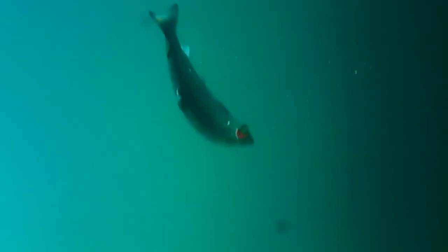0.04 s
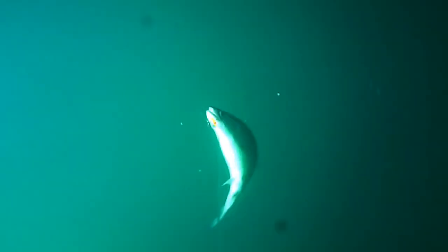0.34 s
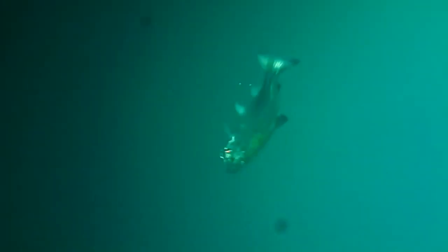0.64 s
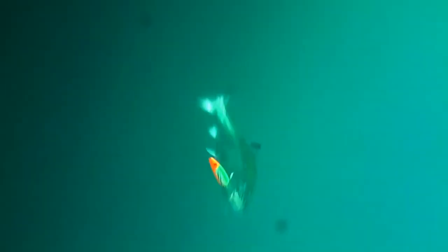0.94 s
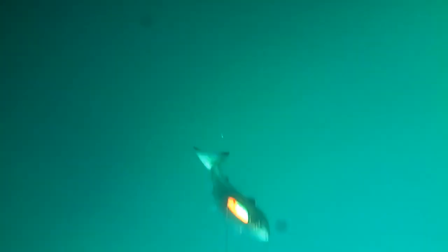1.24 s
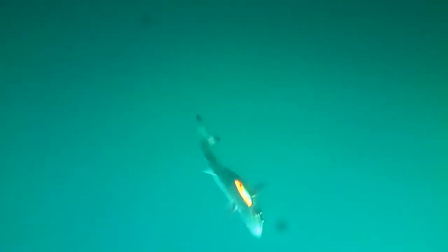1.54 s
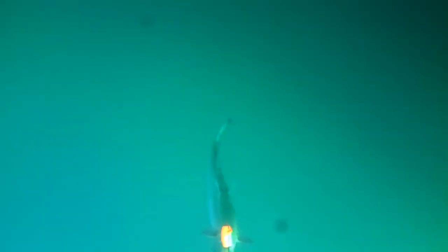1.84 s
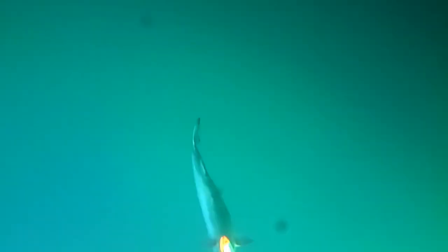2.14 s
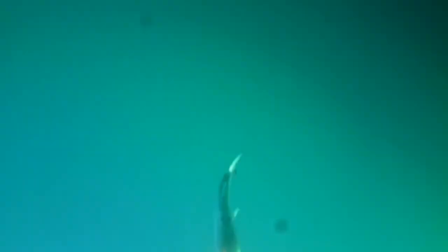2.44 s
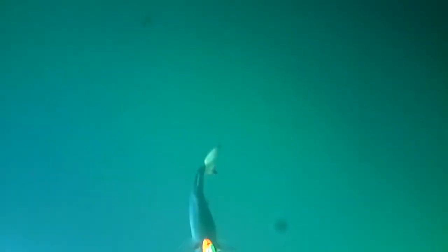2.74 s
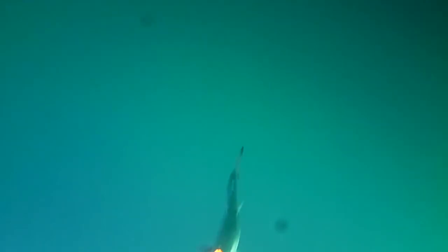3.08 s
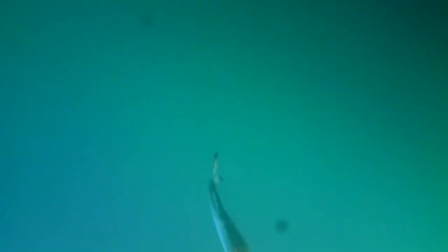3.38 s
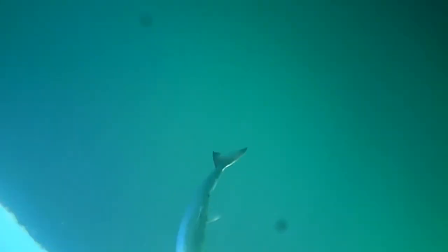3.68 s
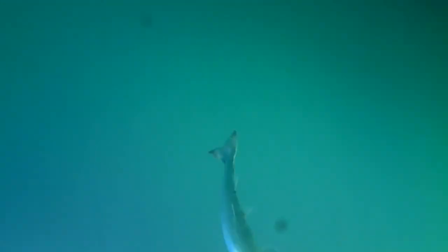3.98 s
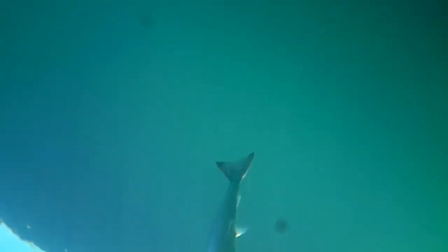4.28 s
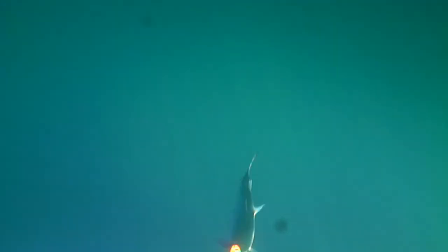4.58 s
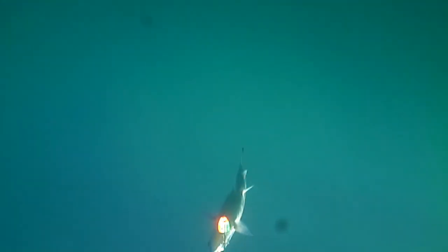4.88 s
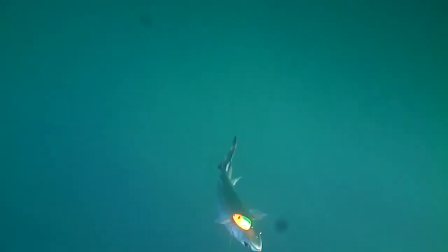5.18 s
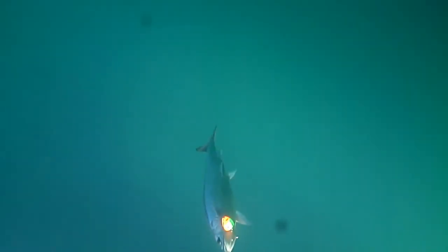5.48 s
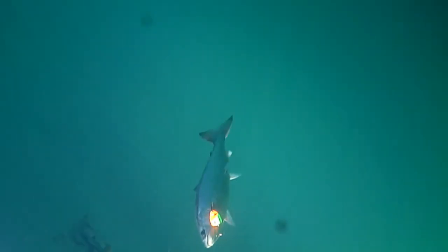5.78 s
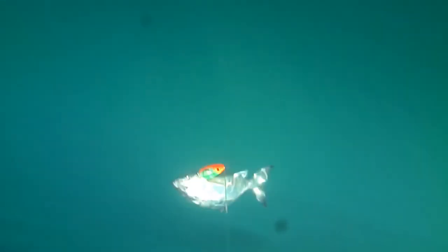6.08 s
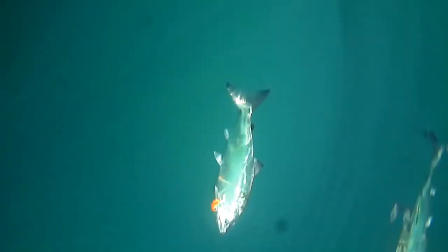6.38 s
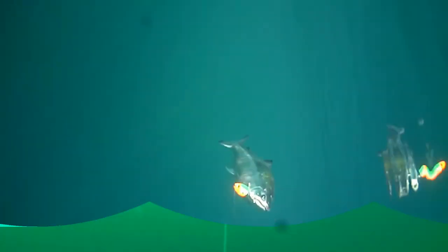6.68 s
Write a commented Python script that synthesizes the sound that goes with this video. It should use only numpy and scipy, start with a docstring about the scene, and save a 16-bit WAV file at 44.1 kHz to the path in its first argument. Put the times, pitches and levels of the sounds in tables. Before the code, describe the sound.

Muffled water rushes past a camera towed under the surface while a hooked fish fights behind it. The line gives a few scraping jerks, then judders in a quick rattle with low buffeting. It builds into a loud, raspy buzz whose pitch rises and falls with each pull, with a few dry ticks on top. After a last pull it fades to a faint buzz and water. Everything is heard from inside the sealed housing.

```python
"""A camera in a sealed housing is towed under water while a hooked fish fights on the line behind it.
Water rushes round the housing and shoves it about; the line gives a few jerks and short, faint notes.
From 0.75 s to 1.75 s the taut line judders in quick jerks that ring the housing near 2-3 kHz.
Then it sings: a buzzing tone whose pitch follows each pull, ringing the housing near 3 kHz, with a few
dry ticks on top. The last pull fades after 6.2 s, leaving a faint buzz and the water."""
import sys
import numpy as np
from scipy import signal
from scipy.fft import rfft, irfft, next_fast_len
from scipy.io import wavfile
from scipy.ndimage import uniform_filter1d

SR = 44100
rng = np.random.default_rng(int(sys.argv[2]) if len(sys.argv) > 2 else 0)


def materialize(psi):
    """Save the field psi as 16-bit PCM at rate SR to the path in sys.argv[1].

    A 1-D psi becomes a single channel; in a 2-D psi each row is a channel.
    """
    bounded = np.clip(np.atleast_2d(psi).T, -1, 1)
    quanta = np.round(bounded * 32767).astype(np.int16)
    wavfile.write(sys.argv[1], SR, quanta)


N = 296351
TIME = np.arange(N) / SR

# Pulls of the fish, each a surge of the line's note:
# full_pull_s, rise_s, hold_s, fall_s, top_pitch_hz, level_db, roughness_0_to_1
PULLS = [(0.066, .014, 0, 0.037, 511, -55, 0.5), (.209, .035, 0, 0.019, 501.5, -34, 0.76),
         (.323, .055, 0.058, 0.024, 744, -30, 0.79), (.473, .036, 0, .016, 491.4, -31, .7),
         (0.665, .076, 0.0094, .03, 608, -23.5, 0.91), (1.595, .092, 0.017, .015, 717.5, -20.5, 0.73),
         (1.752, .038, 0.0057, 0.083, 894, -20.5, 0.76), (1.847, .05, 0.05, 0.073, 728, -15, 0.48),
         (2.085, .051, 0.041, 0.06, 835, -14, 0.34), (2.325, .066, 0.078, 0.057, 834, -12, 0.14),
         (2.557, .035, 0.0059, 0.024, 723, -16, 0.43), (2.713, .062, 0.13, 0.076, 842, -12.5, 0.37),
         (3.143, .05, 0.056, 0.089, 782, -15.5, 0.54), (3.266, .055, 0.07, 0.031, 866, -19, 0.41),
         (3.461, .018, .015, .077, 754, -12, 0.17), (3.632, .025, 0.0029, 0.074, 683.3, -18, 0.66),
         (3.786, .032, 0.04, 0.043, 837, -9, 0.22), (3.927, .03, .006, 0.036, 883.5, -12, 0.42),
         (4.097, .055, 0.0029, 0.15, 977, -11.5, 0.47), (4.275, .051, 0, 0.09, 668, -15, .6),
         (5.006, .031, 0.06, 0.034, 637, -17, 0.03), (5.183, .027, 0.057, 0.051, 556.7, -24, 0.84),
         (5.354, .08, 0.034, 0.031, 692.4, -19.5, 0.17), (5.687, .09, 0.014, 0.026, 708.5, -19.5, 0.34),
         (5.969, .032, 0.051, .05, 748, -20, .95), (6.043, .05, 0.1, 0.19, 781.4, -14, 0.28)]
def pull_envelopes(t, release_power=1.5):
    """How hard each pull acts, 0-1: it builds, holds and lets go."""
    return np.array([np.exp(-(np.maximum(full_s - t, 0) / rise_s) ** 2
                            - (np.maximum(t - full_s - hold_s, 0) / fall_s) ** release_power)
                     for full_s, rise_s, hold_s, fall_s, *_ in PULLS])


# The line's note under the drag of the tow alone: time_s, pitch_hz, level_db
TOW_NOTE = [(0, 328.5, -67), (.55, 325.6, -62.5), (.75, 466, -42.5), (1.399, 580, -47.5),
            (1.7, 707.5, -20.5), (2.22, 635, -42), (2.6, 638.6, -23.5), (3.051, 550, -25.5),
            (3.39, 768.5, -24), (3.58, 585.5, -30.5), (4, 700.8, -27.5), (4.55, 551, -22),
            (4.8, 491.6, -41), (4.921, 476.4, -33), (5.499, 579.4, -34), (5.85, 417, -56),
            (6.398, 420, -43.5), (6.72, 364.4, -38)]
def line_tension(step=64, loudness_power=0.7, slack_rough=0.68, settle_s=0.0256):
    """Pitch, level and roughness of the line: the strongest pull lifts it out of its towing note."""
    t, tow = TIME[::step], np.array(TOW_NOTE)
    top_hz, top_db, top_rough = np.transpose(PULLS)[4:, :, None]
    tow_hz, tow_db = curve(tow[:, [0, 1]], t), curve(tow[:, [0, 2]], t)
    pull = pull_envelopes(t)
    pitch = tow_hz + (pull * (top_hz - tow_hz)).max(0)
    db = tow_db + (pull ** loudness_power * (top_db - tow_db)).max(0)
    # a loosely held line scrapes; a pull takes a moment to settle it into its note
    rough = slack_rough + (pull_envelopes(t - settle_s) * (top_rough - slack_rough)).sum(0)
    db += 2.5 * rough * wander(16)[::step]
    return [np.interp(TIME, t, control) for control in (pitch, db, np.clip(rough, 0, 1))]


def line_phase(pitch, rough):
    """Phase of the line's swing; the pitch wobbles and jitters more when the line scrapes."""
    wobble = (0.006 + 0.025 * rough) * wander(30)
    jitter = (0.00601 + 0.02036 * rough) * wander(110)
    return 2 * np.pi * np.cumsum(pitch * (1 + wobble + jitter)) / SR


def tightening(pitch):
    """How fast the line tightens, as pitch rise in octaves a second."""
    return uniform_filter1d(np.gradient(np.log2(pitch)) * SR, size=1500)


# Ring of the housing when the line drives it: frequency_hz, gain_db
HOUSING_EQ = [(300, -35), (900, -35), (1250, -22), (1600, -12.5), (1900, -12), (2250, -4), (2550, -9),
              (3000, 6), (3400, 1.5), (3750, -6), (4500, -27.5), (5250, -17), (6700, -36), (16000, -33)]
# Dry crackle at the point of contact: frequency_hz, gain_db
CRACKLE_EQ = [(400, -13), (1500, -19), (4400, -10), (5200, 3), (5800, -4), (6600, -9), (8500, -4),
              (10300, -19), (11300, -8), (13000, -29), (14000, -31)]
def line_buzz(phase, pitch, buzz_db, rough, rolloff_hz=6000, loud_db=-15):
    """The line chatters on its mount once a swing and rings the housing; harder chatter is brighter."""
    partials = 0
    for k in range(2, 13):  # each overtone drifts and flickers on its own
        overtone = np.cos(k * phase + 2 * np.pi * rng.random() + 1.9 * rough * wander(28.4))
        flicker = amp(3.5 * wander(45) - (k == 2))  # the second harmonic sits 1 dB lower
        partials += overtone * flicker / (1 + (k * pitch / rolloff_hz) ** 4)
    grit = rng.standard_normal(N) * amp(4 * np.minimum(wander(280), 2))
    tone = steadied(coloured(partials, HOUSING_EQ), size=1500)
    scrape = unit(coloured(grit, HOUSING_EQ))
    # a tightening line scrapes, a slackening one sings
    scrape_share = np.clip(0.029 + 0.6 * rough ** 2 + 0.04 * np.clip(tightening(pitch), 0, 4), 0, 1)
    ring = np.sqrt(1 - scrape_share) * tone + np.sqrt(scrape_share) * scrape
    # tilt the spectrum about 3 kHz with the level
    hz, t, frames = signal.stft(ring, SR, nperseg=512)
    octaves = np.log2(np.clip(hz, 1000, 3700) / 3000)[:, None]
    tilt_db_per_octave = 0.86 * (np.interp(t, TIME, buzz_db) - loud_db)
    ring = signal.istft(frames * amp(tilt_db_per_octave * octaves), SR, nperseg=512)[1][:N]
    level = amp(buzz_db) * grip(rough)
    level *= steadied(amp(1.5 * (1 + rough) * wander(70)), size=1300)  # fast flutter
    # the crackle grows faster than the ring, up to a full grip
    force = np.minimum(level / amp(loud_db), 1.5)
    crackle = amp(-22) * force ** 0.72 * unit(coloured(grit, CRACKLE_EQ))
    return level * (steadied(ring, size=700) + crackle)


# The line loses its grip for an instant, then bites again: bite_s, accent_db
SLIPS = [(1.536, 2), (1.69, 5.5), (1.79, 6), (1.83, 2.5), (1.89, 5.5), (2.061, 8.5), (2.27, 6.5),
         (2.667, 6.5), (2.828, 6), (3.31, 0), (3.446, 1.5), (3.766, 4.5), (3.81, 1), (4.064, 9.5),
         (4.261, 0), (4.977, -3.5), (5.275, -5), (5.662, 0.5), (6.017, 0), (6.15, 4.5)]
def grip(rough, slip_db=-12, slip_s=0.0074, accent_decay_s=0.035, stutter_db=-9, stutter_s=0.0065):
    """Gain of the contact: short drops, most with a harder bite after; scraping adds random stutters."""
    db = np.zeros(N)
    for bite_s, accent_db in SLIPS:
        db[(TIME > bite_s - slip_s) & (TIME < bite_s)] += slip_db
        after = TIME >= bite_s
        db[after] += accent_db * np.exp(-(TIME[after] - bite_s) / accent_decay_s)
    starts = rng.random(N) < 20 * rough / SR
    stutters = signal.oaconvolve(starts.astype(float), np.ones(round(stutter_s * SR)), "same")
    db += stutter_db * np.minimum(stutters, 1)
    return amp(uniform_filter1d(db, 70))


# Low resonance of the housing, which carries the fundamental: frequency_hz, gain_db
LOW_BODY_EQ = [(300, 9), (430, -1.5), (500, 0), (600, -11.5), (800, -16), (1000, -6)]
def line_swing(phase, pitch, buzz_db, full_swing_db=-36):
    """The fundamental grows with the buzz up to a full swing and rings out as the line slackens."""
    drive_db = -41 + 0.72 * np.minimum(buzz_db - full_swing_db, 0)
    bloom_db = -6 * np.tanh(tightening(pitch) / 4)
    flutter = unit(amp(3 * wander(21)))
    return np.sqrt(2) * np.sin(phase) * amp(drive_db + bloom_db + spectrum(LOW_BODY_EQ, pitch)) * flutter


# Swells of the judder: time_s, level_db
JUDDER_LEVEL = [(.74, -17), (.87, -11.5), (1.06, -19.5), (1.22, -11.5), (1.4, -14.5), (1.55, -11.5),
                (1.75, -25.5)]
def judder(first_s=0.7455, jerks_per_s=26, rocks_per_s=7.43, rock_low_s=0.9, mean_length_s=0.0062):
    """The line judders: rows for an almost even train of jerks, no two quite alike."""
    times = np.arange(first_s, JUDDER_LEVEL[-1][0], 1 / jerks_per_s)
    late, strong, high, long = rng.uniform(-1, 1, (len(times), 4)).T
    # the contact rocks, so the jerks ring the housing now low, now high, over a slow climb
    rock = np.tanh(4.9 * np.cos(2 * np.pi * rocks_per_s * (times - rock_low_s)))
    centre_hz = 2623 - 576 * rock + 150 * (times - times.mean()) + 130 * high
    level_db = curve(JUDDER_LEVEL, times) + 2 * strong
    length_s = mean_length_s * (1 + 0.74 * long)
    return list(zip(times + 0.0015 * late, level_db, centre_hz, length_s))


# Lone jerks of the line: peak_s, level_db, centre_hz, length_s
SINGLE_JERKS = [(0.205, -27.5, 1890, 0.011), (0.318, -12, 3430, 0.0098), (0.344, -13, 2120, 0.007),
                (0.385, -10, 2240, 0.013), (0.696, -20.5, 2960, 0.0054), (1.796, -9, 3245, 0.0041),
                (5.283, -15.5, 3000, 0.0058), (5.933, -26, 2043, 0.0042), (5.945, -17.5, 2235, 0.0078),
                (5.966, -17.5, 2286, 0.019)]
# Duller crackle of a jerk: frequency_hz, gain_db
JERK_CRACKLE_EQ = [(500, -1.5), (4400, 2), (5500, 10), (7000, -7), (10000, -5.5), (13000, -48),
                   (16000, -41)]
def jerks(rows, half_width_hz=400, tail_s=0.0096, loud_db=-15):
    """Each jerk is a short scrape that bites and dies away, ringing one region of the housing."""
    out, t = np.zeros(N), np.arange(-2048, 2048) / SR
    hz = np.fft.rfftfreq(len(t), 1 / SR)
    body = amp(spectrum(HOUSING_EQ, hz) / 2)
    for peak_s, db, centre_hz, length_s in rows:
        focus = np.sqrt(body) / (1 + ((hz - centre_hz) / half_width_hz) ** 4) + 0.26 * body ** 2
        grit = rng.standard_normal(len(t))
        ring = steadied(irfft(rfft(grit) * focus), size=130)
        crackle = amp(-21 + 1.5 * (db - loud_db)) * unit(coloured(grit, JERK_CRACKLE_EQ))
        slope_s = length_s * np.where(t < 0, 0.41, 0.5)  # attack, release
        bite = np.exp(-0.5 * (t / slope_s) ** 2)
        tail = amp(-17) * np.exp(-abs(t) / tail_s) * (1 + np.tanh(t / length_s))
        scrape = (ring + crackle) * (bite + tail)
        scrape *= np.sqrt(length_s * SR / np.sum(scrape ** 2))
        add(out, round(peak_s * SR) - len(t) // 2, amp(db) * scrape)
    return out


def limit_chatter(x, ceiling=0.48):
    """The chatter cannot swing wider than its play: loud stretches flatten."""
    reach = np.sqrt(abs(smoothed(2 * x ** 2, size=60)))
    return x / (1 + (reach / ceiling) ** 6) ** (1 / 6)


# Small dry ticks on the housing: start_s, peak_db
TICKS = [(2.779, -8), (3.316, -17), (3.923, -13), (4.813, -34.5), (5.28, -23.5), (6.199, -23),
         (6.259, -24.5)]
def ticks(decay_s=0.004):
    """Single bright snaps of the contact crackle."""
    out, t = np.zeros(N), np.arange(512) / SR
    for start_s, peak_db in TICKS:
        snap = coloured(rng.standard_normal(len(t)), CRACKLE_EQ) * np.exp(-t / decay_s)
        add(out, round(start_s * SR), amp(peak_db) * snap / abs(snap).max())
    return out


# Swells of the buffeting: time_s, level_db
BUFFET_LEVEL = [(0.0, -34.5), (0.05, -37), (0.19, -37), (0.26, -30), (0.34, -23.5), (0.52, -40),
                (0.58, -30), (0.63, -41), (0.78, -22), (1.37, -24.5), (2.09, -44.5), (3.99, -42),
                (4.19, -32), (4.53, -42), (5.69, -42), (5.78, -24), (5.99, -45.5), (6.72, -44.5)]
# Its sub-bass rumble: frequency_hz, gain_db
BUFFET_EQ = [(10, 2.5), (26, 1.5), (40, -15), (60, -13.5), (100, -46), (200, -56), (600, -100)]
def buffeting(jerk_rows, tug_s=0.0062, lag_s=0.00067):
    """Eddies shove the housing; each jerk pulls it forward and lets it fall back."""
    rumble = unit(coloured(rng.standard_normal(N), BUFFET_EQ))
    for peak_s, *_ in jerk_rows:
        progress = np.clip((TIME - peak_s - lag_s) / tug_s, -10, 10)
        rumble += 3.8 * np.tanh(-2 * progress) * np.exp(-progress ** 2 / 4)
    return amp(curve(BUFFET_LEVEL)) * steadied(rumble, size=5000)


# Swells of the rushing water: time_s, level_db
RUSH_LEVEL = [(0, -49), (.35, -37), (.55, -45), (.9, -38.5), (1.6, -39), (2.2, -44), (4.2, -42),
              (4.8, -45.5), (5.5, -46.5), (6.1, -40), (6.72, -53.5)]
# Its muffled, boxy colour: frequency_hz, gain_db
RUSH_EQ = [(40, 7.5), (70, 1.5), (100, -1.5), (140, -3.5), (180, 1.5), (212, 8), (250, 1.5), (340, -5.5),
           (470, 2.5), (700, -13), (1000, -20), (1400, -3.5), (3000, -15.5), (6000, -46)]
def water_rush():
    """Lumpy flow noise, heard through the walls of the housing."""
    lumps = amp(2 * wander(90))
    return amp(curve(RUSH_LEVEL)) * unit(coloured(rng.standard_normal(N) * lumps, RUSH_EQ))


# Colour of the hiss: frequency_hz, gain_db
HISS_EQ = [(300, -13), (3000, 1), (5000, 3), (10000, -0.5), (12000, -37), (16000, -35)]
def microphone_hiss(level_db=-64):
    """The microphone's own steady noise floor."""
    return amp(level_db) * unit(coloured(rng.standard_normal(N), HISS_EQ))


def shimmer(x):
    """A side signal that makes the treble flicker faintly between left and right."""
    side_eq = [(60, -42), (200, -30), (1500, -31), (3200, -18.5), (5000, -10.5), (15000, 1)]
    hz, _, frames = signal.stft(x, SR, nperseg=512)
    frames = frames * rng.standard_normal(frames.shape) * amp(spectrum(side_eq, hz[:, None]) - 15)
    return signal.istft(frames, SR, nperseg=512)[1][:N]


def amp(db):
    """Decibels to gain."""
    return 10 ** (np.asarray(db) / 20)


def curve(rows, t=TIME):
    """Reads (time_s, value) rows at the times t."""
    return np.interp(t, *np.transpose(rows))


def spectrum(eq, hz):
    """Reads (frequency_hz, gain_db) rows on a log-frequency axis."""
    points_hz, db = np.transpose(eq)
    return np.interp(np.log(hz + 1), np.log(points_hz), db)


def coloured(x, eq):
    """Filters x through an EQ curve."""
    size = next_fast_len(len(x), real=True)
    gain = amp(spectrum(eq, np.fft.rfftfreq(size, 1 / SR)))
    return irfft(rfft(x, size) * gain, size)[:len(x)]


def unit(x):
    """Scales to rms 1."""
    return x / np.sqrt(np.mean(x ** 2) + 1e-20)


def smoothed(x, size):
    """Two moving averages of size samples."""
    return uniform_filter1d(uniform_filter1d(x, size), size)


def steadied(x, size):
    """Rides the gain to hold the rms near 1 over stretches of size samples."""
    return x / np.sqrt(abs(smoothed(x ** 2, size)) + 1e-20)


def wander(rate_hz):
    """Random modulation of rms 1, with little above the rate."""
    size = next_fast_len(N, real=True)
    hz = np.fft.rfftfreq(size, 1 / SR)
    return unit(irfft(rfft(rng.standard_normal(size)) / (1 + (hz / rate_hz) ** 2), size)[:N])


def add(mix, start, sound):
    """Mixes a sound in from the sample start."""
    part = mix[start:][:len(sound)]
    part += sound[:len(part)]


def scene():
    """Line and water reach one microphone inside the housing; a faint shimmer widens the sound."""
    pitch, buzz_db, rough = line_tension()
    phase = line_phase(pitch, rough)
    jerk_rows = list(SINGLE_JERKS) + judder()
    chatter = limit_chatter(line_buzz(phase, pitch, buzz_db, rough) + jerks(jerk_rows))
    line = chatter + ticks() + line_swing(phase, pitch, buzz_db)
    inside = line + buffeting(jerk_rows) + water_rush() + microphone_hiss()
    side = shimmer(inside)
    return np.array([inside + side, inside - side])


def record(dry, mirror_hz=12000, tilt_pivot_hz=3200, cutoff_hz=15900):
    """Coarse resampling mirrors the sound faintly about 12 kHz; a steep low-pass trims the top."""
    treble = np.gradient(dry, axis=1) * SR / (2 * np.pi * tilt_pivot_hz)
    mirrored = 2 * amp(-22) * treble * np.cos(2 * np.pi * mirror_hz * TIME)
    low_pass = signal.firwin(511, cutoff_hz, window=("kaiser", 9), fs=SR)
    return signal.oaconvolve(dry + mirrored, low_pass[None], "same")


dry = scene()
out = record(dry)
materialize(out)
```